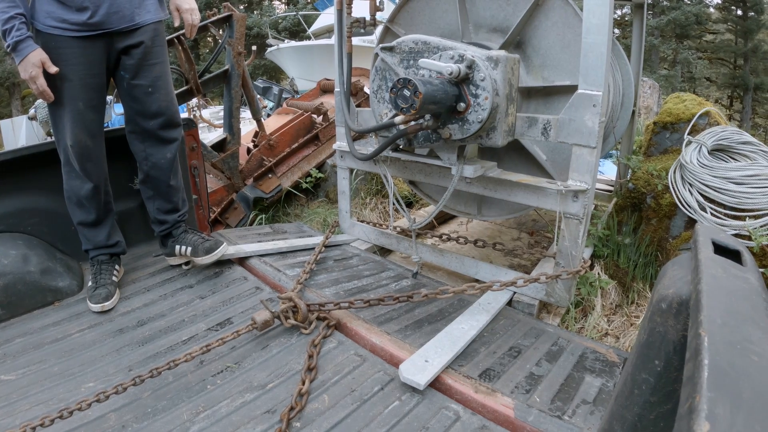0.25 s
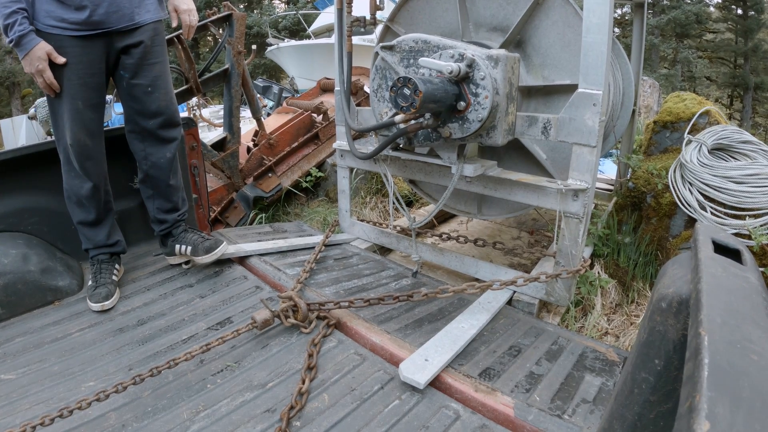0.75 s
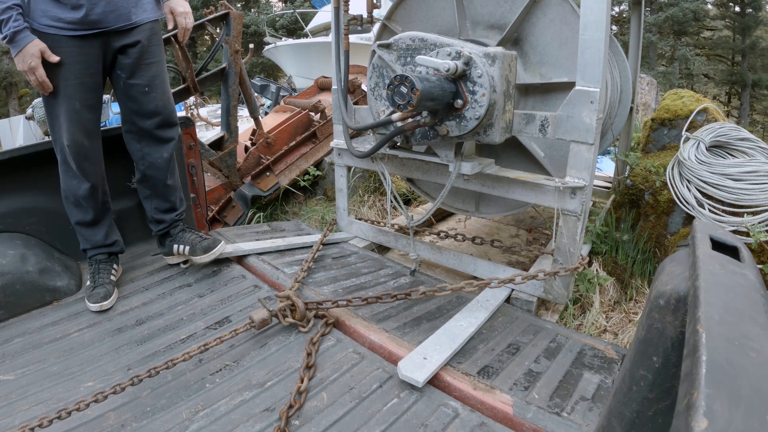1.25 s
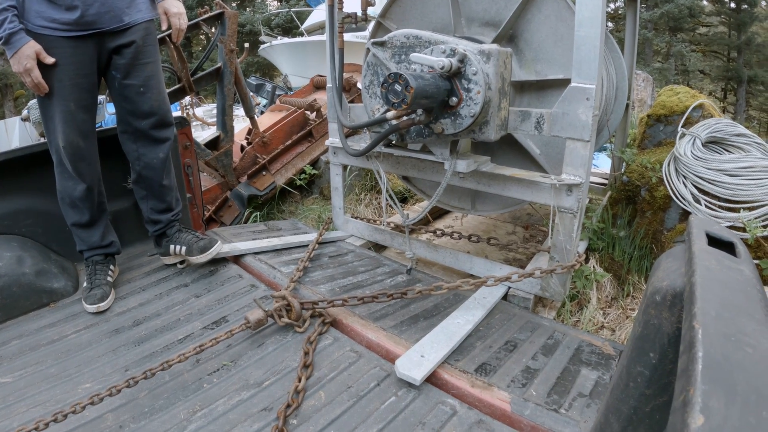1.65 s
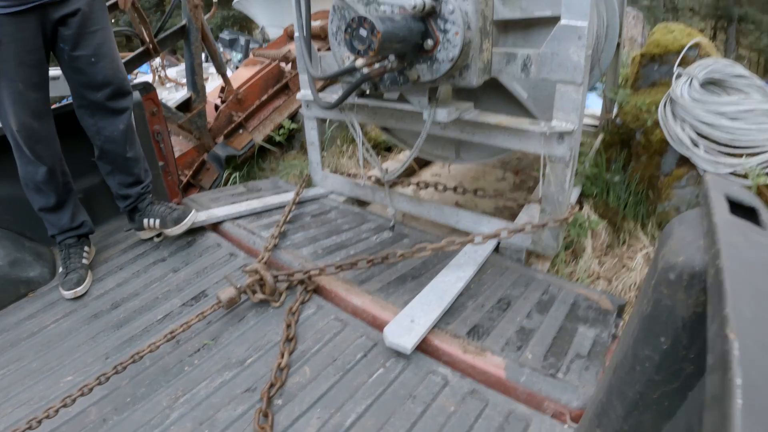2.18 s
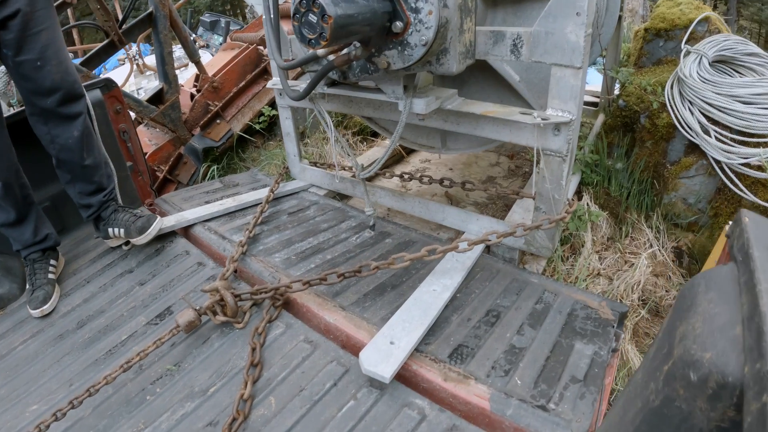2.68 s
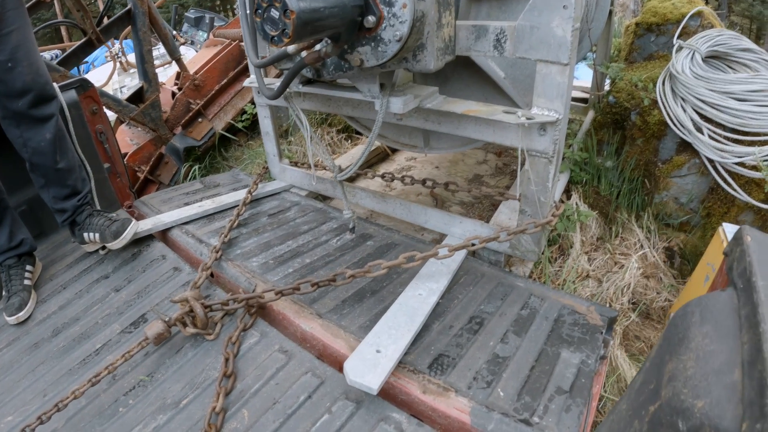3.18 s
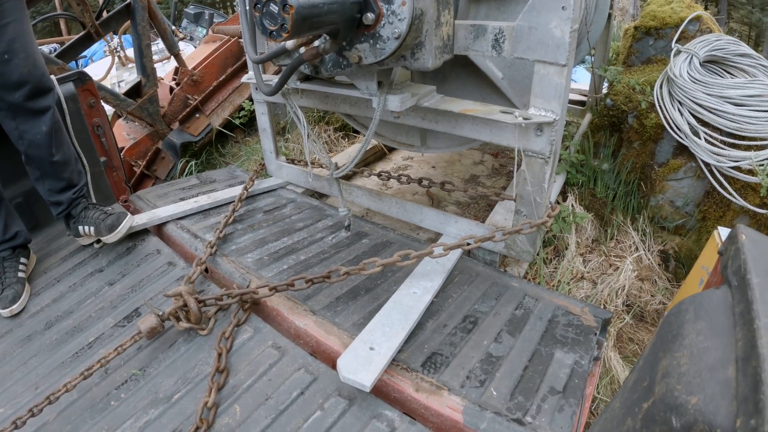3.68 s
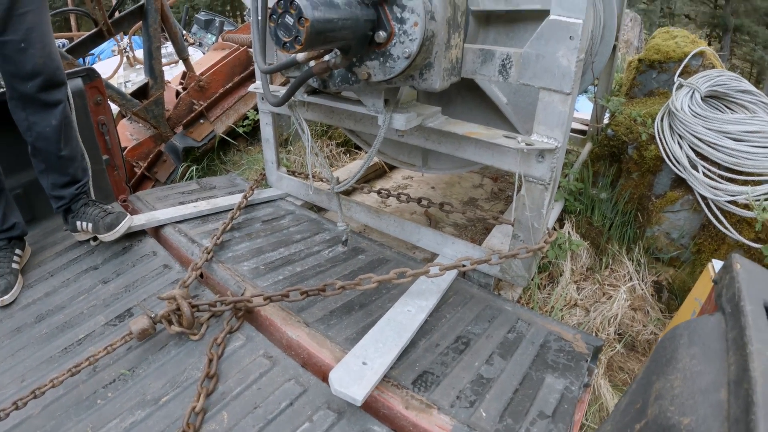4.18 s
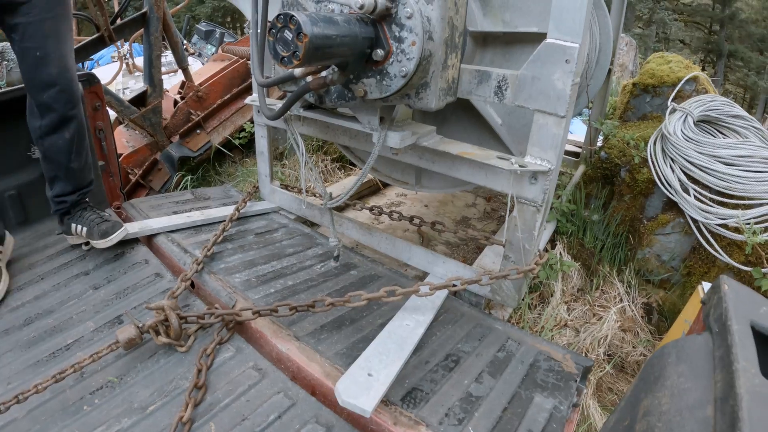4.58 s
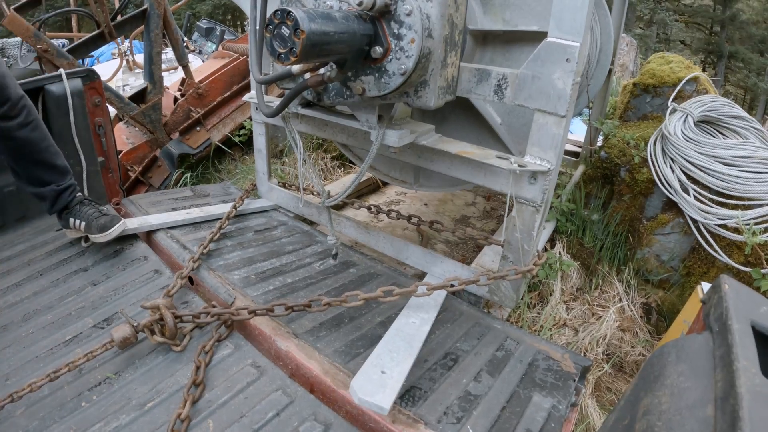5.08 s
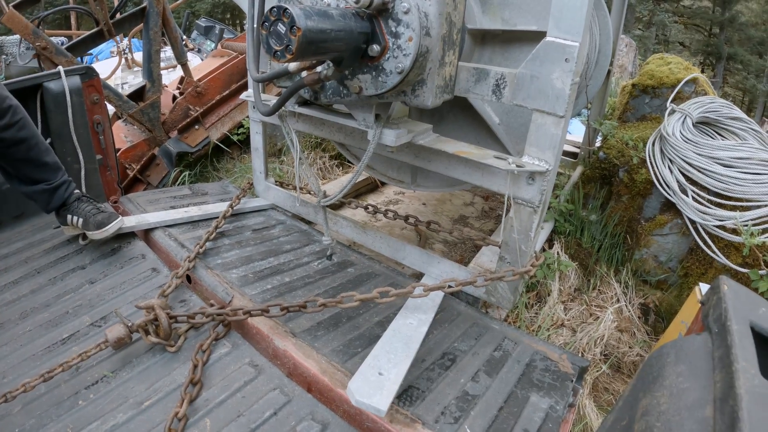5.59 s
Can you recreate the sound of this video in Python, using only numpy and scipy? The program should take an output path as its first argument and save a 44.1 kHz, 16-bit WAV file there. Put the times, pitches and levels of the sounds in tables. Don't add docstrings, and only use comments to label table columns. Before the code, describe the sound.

A hand ratchet winch clicks in rapid metallic bursts as a heavy steel reel scrapes over a booming truck bed, then a boot scuffs and stamps.

```python
import sys
import numpy as np
from scipy import signal
from scipy.io import wavfile
from scipy.ndimage import uniform_filter1d

SR = 44100
rng = np.random.default_rng(int(sys.argv[2]) if len(sys.argv) > 2 else 0)


def invert_db(x):
    u = np.asarray(x, float) / 20
    return 10 ** u


def transcribe(u):
    v = np.clip(np.atleast_2d(u).T, -1, 1)
    q = np.round(v * 32767).astype(np.int16)
    wavfile.write(sys.argv[1], SR, q)


N = 257984
LEAD = 900
BOOT_S = 5.098

# (frequency [Hz], level [dB per Hz])
CHATTER = [(350, -41), (600, -23), (1060, -2.5), (1840, -9), (2670, -8.5), (3020, -11), (4900, -8),
           (5860, -13.5), (6370, -3.5), (8000, -21), (11300, -35)]
# (start [s], end [s])
PULLS = [
    (0, .45),
    (1.2, 1.5),
    (2.66, 3.0),
    (3.7, 4.1),
    (5.0, 5.85),
]
# (time [s], peak [dB], frame clank [dB rel], chatter length [ms])
HAULED = [(0.083, -8.5, -5, 11.8), (.174, -7, -8.5, 8.8), (0.2518, -9, -9.5, 10.8), (0.3025, -13.5, -6, 23),
          (0.318, -19.5, -2.5, 16), (1.267, -9, -3.5, 11), (1.3342, -11, -9.5, 17), (1.395, -11, -11.5, 12),
          (1.4606, -10.5, -10.5, 13.3), (2.6884, -10.5, -12, 14), (2.7552, -10, -10, 15),
          (2.812, -14, -3.5, 13.3), (2.8692, -13, -6, 9.6), (2.9638, -11, -5.5, 10), (3.758, -12, -8, 18),
          (3.8388, -9, -10, 13), (3.911, -12, -10, 20.6), (3.9721, -12.5, -33, 17), (4.0476, -9, -9.5, 13)]


def rms_one(x):
    return x / np.sqrt(np.mean(x ** 2) + 1e-20)


def in_time(rows, outside=None):
    s, *columns = np.transpose(rows)
    return [np.interp(np.arange(N) / SR, s, c, outside, outside) for c in columns]


def at_hz(points, hz):
    table_hz, values = np.array(points)[:, 0], np.array(points)[:, 1]
    return np.interp(np.log(hz), np.log(table_hz), values)


def filled(coarse):
    return np.interp(np.arange(N) / 32, np.arange(len(coarse)), coarse)


def add(out, s, piece):
    at = round(s * SR)
    out[..., at:at + piece.shape[-1]] += piece[..., :N - at]


def drift(rate):
    r = np.exp(-80 * np.pi * rate / SR)
    slow = signal.lfilter([1], [1, -2 * r, r * r], rng.standard_normal(N // 40 + 2002))[2000:]
    return np.interp(np.arange(N) / 40, np.arange(len(slow)), rms_one(slow))


def ring(force, hz, t60):
    r, w = invert_db(-60 / (t60 * SR)), 2 * np.pi * hz / SR
    gain = 2 * np.sqrt(1 - r) * np.sin(w)
    return signal.lfilter([0, gain], [1, -2 * r * np.cos(w), r * r], force + 1e-18)


def grains(per_s, spread_db, size=N):
    heights = invert_db(spread_db * np.minimum(rng.exponential(1, (2, size)), 4))
    signs = rng.choice([-1, 1], (2, size))
    return rms_one(heights * signs * (rng.random((2, size)) < per_s / SR))


def bands(low_hz, sources, order=2):
    edges = low_hz * 2 ** np.arange(0, np.log2(18000 / low_hz), .5)
    for k, (low, high) in enumerate(zip(edges, edges[1:])):
        sos = signal.butter(order, [low, high], "band", fs=SR, output="sos")
        yield np.sqrt(low * high), signal.sosfilt(sos, sources[k % 2])


def placed(pair, hz, likeness, balance_db):
    alike = np.clip(at_hz(likeness, hz), 0, 1)
    both = np.sqrt(1 + alike) * pair[0] + np.sqrt(1 - alike) * pair[1] * [[1], [-1]]
    return both * invert_db(balance_db / 2 * np.array([[1], [-1]])) / np.sqrt(2)


def near(pair, hz):
    # (frequency [Hz], left-right likeness [0-1])
    near_likeness = [(60, 1.0), (180, 1), (550, 0.9), (1650, 0.63), (4970, 0.6), (15000, 0.019)]
    # (frequency [Hz], left over right [dB])
    near_balance = [(60, 0.5), (150, 0.5), (380, 0.5), (950, 8), (2380, 5), (5980, 1), (15000, 8)]
    return placed(pair, hz, near_likeness, at_hz(near_balance, hz))


def chatter(length_ms, rise_ms, slide_db=-30, rattle_db=-14, size=4000):
    ms = (np.arange(size) - LEAD) * 1000 / SR
    after = np.maximum(ms, 0)
    hold = np.exp(-(after / max(length_ms, 1)) ** 2)
    rattle = invert_db(rattle_db) * np.exp(-after / (1.62 * length_ms))
    slide = invert_db(slide_db) * np.exp(-np.abs(ms) / 19.0)
    return (1 - np.exp(-after / rise_ms)) * (hold + rattle) + slide


def drops():
    # (time [s], peak [dB], frame clank [dB rel], chatter length [ms])
    returned = [(0.6497, -10.5, -10.5, 17), (0.7458, -11, -10, 23.5), (0.8546, -13.5, -8, 17.2),
                (1.0232, -14.5, -11, 12), (1.704, -15, -4, 15.8), (1.7995, -9.5, -13, 14.5),
                (1.8941, -15, -6.5, 22.3), (2.1369, -11.5, -12, 18.2), (2.2154, -13, -7.5, 19),
                (2.297, -11.5, -10, 18), (3.183, -11.5, -12.5, 20), (3.257, -10, -13.5, 17),
                (3.3307, -14, -9, 16), (3.4398, -14, -7, 12.2), (4.2987, -13, -7.5, 13.8),
                (4.383, -14, -8.5, 22), (4.482, -14.5, -4, 15.4)]
    # (time [s], peak [dB], sharpness [dB rel], chatter length [ms])
    clunks = [(0.541, -11.5, -35, 13.8), (1.132, -45, -28, 16), (1.975, -32, -52, 6.5),
              (2.0566, -12.5, -52, 21.2), (2.5126, -24.5, -42, 12), (2.54, -27.5, -49.5, 7.4),
              (2.552, -21, -54, 16), (3.0612, -13, -60, 13.5), (3.1233, -18, -58.5, 9.5),
              (3.3916, -16, -62.5, 11), (3.5044, -39, -53, 18), (3.564, -16, -71, 8.5),
              (3.8138, -24, -36, 14), (4.178, -18.5, -62, 16), (4.2034, -29, -45.5, 7.9),
              (4.2353, -23.5, -39, 12), (4.4621, -27, -54, 32)]
    # (time [s], peak [dB], frame clank [dB rel], chatter length [ms])
    slips = [(.046, -27.5, -5.5, 6.2), (0.15, -28, 3.5, 2.7), (0.227, -30, -30, 53), (1.007, -39.5, 0, 10),
             (1.2362, -30, -4, 7.6), (1.6506, -24.5, -1.5, 15), (2.2052, -33, 3, 8.2),
             (3.7256, -29.5, -1.5, 7.2), (4.0211, -23, -6, 14), (5.255, -36, 2, 16),
             (5.31, -37.5, 15.5, 5.7), (5.344, -20, -36, 16), (5.409, -24, -34, 8), (5.4165, -18, -37, 12)]
    stroke_sharp_db = [-1, -6, 2.5, -0.8]
    strikes = []
    for s, db, clank, ms in HAULED:
        stroke = sum(s > end for _, end in PULLS)
        strikes.append((s, db, clank, -13.5 + stroke_sharp_db[stroke], 3, ms))
    for s, db, clank, ms in returned:
        strikes.append((s, db, clank, -23.5 + 1.44 * s, -1 + 1.2 * s, ms))
    for s, db, sharp, ms in clunks:
        strikes.append((s, db, -10.5 - 0.46 * (db + 6), sharp, -5.5, ms))
    for s, db, clank, ms in slips:
        strikes.append((s, db, clank, -20, -6, ms))
    return sorted(strikes)


def click_db(hz):
    s, peak_db, clank_db, sharp_db, *_ = np.transpose(drops())
    low = np.interp(np.log(hz), np.log([1300, 2500]), [1, 0])
    high = np.interp(np.log(hz), np.log([6500, 10000, 15000]), [0, 1.0, 1.5])
    return peak_db + low * (clank_db + 10.5) + high * (sharp_db + 26)


def bursts(levels_db, rise_ms):
    out = np.zeros(N)
    for (s, _, _, sharp_db, _, length_ms), db in zip(drops(), levels_db):
        soft = 1 + max(0, -sharp_db - 28) / 9
        start_s = s - LEAD / SR - .0008 * (soft - 1)
        add(out, start_s, invert_db(db) * chatter(length_ms, rise_ms * soft))
    return out


def swell(s, db, rise_s, hold_s, fall_db_per_s):
    after = np.arange(0, N, 32) / SR - s
    fall_db = fall_db_per_s * np.maximum(after - rise_s - hold_s, 0)
    return (invert_db(db - np.minimum(fall_db, 200)) * np.clip(after / rise_s, 0, 1) ** 2) ** 2


def scrape(level, grit_db, spectrum, low_hz, per_s, clumpy_db):
    rub, size = 0, len(level)
    for hz, pair in bands(low_hz, [grains(per_s, 4.6, size), grains(per_s, 0.32, size)]):
        gritty = np.interp(np.log(hz), np.log([2000, 4500]), [0, 1])
        rub = rub + near(pair, hz) * invert_db(at_hz(spectrum, hz) + grit_db * gritty)
    return level * invert_db(clumpy_db * drift(100)[:size]) * rms_one(rub)


def road(offset_db=3, patchy_db=.8):
    # (frequency [Hz], level [dB per Hz])
    wash = [(18, -33), (30, 1), (76, 12), (119, -16), (158, -6.5), (384, -14.5), (774, -11.5), (905, -0.5),
            (1090, -8), (1600, -17.5), (1730, -27), (3230, -32), (8000, -41), (11500, -48), (14000, -78)]
    # (time [s], level [dB])
    road_level = [(0.0, -38.5), (0.57, -42.5), (2.64, -42.5), (3.27, -36), (3.57, -40.5), (3.8, -43.5),
                  (3.91, -39), (4.69, -43.5), (5.51, -39), (5.85, -41.5)]
    # (frequency [Hz], left-right likeness [0-1])
    far_likeness = [(60, 1.0), (380, 0.97), (2380, 0.41), (15000, 0.37)]
    out = 0
    for hz, pair in bands(27.05, rng.standard_normal((2, 2, N))):
        out = out + invert_db(at_hz(wash, hz) + patchy_db * drift(3.2)) * placed(pair, hz, far_likeness, .7)
    return invert_db(in_time(road_level)[0] + offset_db) * rms_one(out)


def small_things(tick_db=2, buckle_db=-24):
    # (time [s], peak [dB])
    ticks = [(1.991, -44), (2.0144, -44), (2.4364, -42), (2.673, -35), (4.993, -39.5), (5.013, -51),
             (5.0234, -40), (5.121, -34), (5.1324, -45), (5.237, -44), (5.2827, -30), (5.302, -32),
             (5.5343, -28), (5.5424, -52), (5.6834, -57), (5.7831, -42)]
    # (time [s], peak [dB])
    jingles = [
        (5.5877, -33.5),
        (5.6945, -32),
    ]
    # (frequency [Hz], level [dB], t60 [s])
    buckle = [(3800, -6, .02), (4400, -1, .018), (5800, 0, .018), (8000, 0, .02), (10100, -8, .018)]
    out, ms = np.zeros(N), np.arange(3000) * 1000 / SR
    crack_band = signal.butter(3, [1800, 8000], "band", fs=SR, output="sos")
    for s, db in ticks:
        crack = rng.standard_normal(len(ms)) * np.exp(-ms / .5)
        add(out, s, invert_db(db + tick_db) * signal.sosfilt(crack_band, crack))
    for s, db in jingles:
        shake = rng.standard_normal(len(ms)) * np.exp(-ms / 8.0)
        jingle = sum(invert_db(mode_db) * ring(shake, hz, t60) for hz, mode_db, t60 in buckle)
        add(out, s, invert_db(db + buckle_db) * jingle * 4)
    return out * invert_db(np.array([[1.5], [-1.5]]))


def boot(hollow_db=-12):
    # (time [s], level [dB], rise [s], hold [s], fall [dB/s])
    footfalls = [
        (5.13, -31, 0.14, .05, 300),
        (5.26, -20, 0.047, .11, 348),
        (5.44, -36, .01, 0.046, 206),
        (5.555, -12, 0.0022, 0.029, 427),
        (5.636, -34, 0.024, 0.024, 137),
    ]
    # (start [s], end [s])
    flat_s = (4.9, 6.4)
    # (frequency [Hz], level [dB per Hz])
    sole = [(53, -41), (90, -13), (212, 2.5), (733, -8.5), (948, -11), (1310, -14), (1550, -17),
            (2330, -26), (5030, -30), (11100, -51), (15000, -62)]
    # (frequency [Hz], level [dB], t60 [s])
    hollow = [(186.5, 2.5, 0.68), (209.7, 6, 0.28), (269, 3.5, 0.4), (438, 3.5, 0.077)]
    out, start = np.zeros((2, N)), round(BOOT_S * SR)
    level = filled(np.sqrt(sum(swell(*row) for row in footfalls)))[start:]
    s = np.arange(start, N) / SR
    grit_db = np.where((s > flat_s[0]) & (s < flat_s[1]), -11.5, 11.5)
    force = level * invert_db(hollow_db) * rng.standard_normal((2, N - start))
    drum = sum(invert_db(db) * near(ring(force, hz, t60), hz) for hz, db, t60 in hollow)
    add(out, BOOT_S, drum + scrape(level, grit_db, sole, 99.6, per_s=7600, clumpy_db=1.0))
    return out


def skids():
    # (time [s], scrape [dB])
    drag = [
        [(1.26, -64), (1.28, -22), (1.34, -45), (1.45, -43)],
        [(2.5, -63), (2.54, -34.5), (2.62, -49.5), (2.68, -44)],
        [(2.7, -46), (2.85, -32.5), (2.93, -38), (3.0, -88), (3.3, -37.5), (3.55, -50)],
        [(3.9, -45), (3.93, -26), (3.99, -20), (4.05, -30), (4.09, -37)],
    ]
    # (frequency [Hz], level [dB per Hz])
    skid = [(350, -29), (600, -1), (734, -5.5), (911, -4), (1910, -7.5), (7750, -25), (15000, -51.5)]
    out = np.zeros((2, N))
    pull = sum(invert_db(in_time(rows, outside=-150)[0]) for rows in drag)[:round(4.2 * SR)]
    add(out, 0, scrape(pull, 0, skid, 537, per_s=4100, clumpy_db=-0.5))
    return out


def shaking():
    # (time [s], boom [dB], drumming [dB], rib knock [dB], hold [s])
    lurches = [(0.3, -15.5, -19.5, -30, 0.087), (0.534, -22, -21, -34.5, 0.087),
               (0.756, -27, -22.5, -41, 0.092), (1.014, -17.5, -24, -37.5, 0.096),
               (1.274, -18, -18, -24.5, .09), (1.695, -21.5, -21, -33.5, 0.092),
               (1.903, -24.5, -20.5, -50, 0.098), (2.051, -27, -19, -31.5, .05),
               (2.541, -15, -21.5, -39, 0.079), (3.261, -27.5, -23.5, -38.5, 0.059),
               (3.558, -16.5, -27.5, -58, 0.066), (3.912, -25, -17, -33.5, 0.17),
               (4.174, -22, -23.5, -35.5, 0.037), (4.404, -28, -22.5, -49, 0.035),
               (5.047, -37.5, -55, -52, 0.1)]
    # (level under a drop [dB], rise [s], fall [dB/s], share of a lurch's hold [0-1], rest level [dB])
    panels = [
        (-14.5, 0.026, 107.5, 1, -65.5),
        (-11, 0.0052, 111, 0.41, -53.5),
        (-26, 0.0058, 226, 0.35, -55.5),
    ]
    hauled_shake_db = [-1.5, -4, 1]
    hauled = [row[0] for row in HAULED]
    for family, (under_db, rise_s, fall, share, rest_db) in enumerate(panels):
        power = invert_db(rest_db) ** 2
        for s, db in zip(np.array(drops())[:, 0], click_db([3000, 3000, 1000][family])):
            if s < BOOT_S:
                taut_db = hauled_shake_db[family] * (s in hauled)
                power = power + swell(s, db + under_db + taut_db, rise_s, rise_s, fall)
        for s, *levels_db, hold_s in lurches:
            power = power + swell(s, levels_db[family], 0.36 * rise_s, share * hold_s, 1.23 * fall)
        yield filled(10 * np.log10(power))


def bed(jolt_db=14, lumpy_db=0.5):
    # (frequency [Hz], level [dB], t60 [s])
    bed_modes = [(51, -7, 0.23), (72, 4, 0.2), (91.6, 2, 0.19), (126.4, -16, 0.15), (150.9, 7.5, 0.084),
                 (174.6, -0.5, 0.047), (210, 0, 0.071), (235, -10, 0.13), (284.3, -12.5, 0.22),
                 (350, -14, .1), (423.4, -1.5, 0.21), (484.6, 3.5, 0.038), (572.7, 1.5, 0.054),
                 (611, -13, 0.18)]
    out, jolt = 0, bursts(np.array(drops())[:, 1] + jolt_db, rise_ms=26.0)
    force = rng.standard_normal((2, N)) * (0.89 + jolt) * invert_db(lumpy_db * drift(25))
    for (low, high), level_db in zip([(38, 110), (110, 400), (400, 750)], shaking()):
        group = sum(invert_db(db) * ring(force, hz, t60) for hz, db, t60 in bed_modes if low < hz <= high)
        sos = signal.butter(2, [1.17 * low, 1.11 * high], "band", fs=SR, output="sos")
        group = signal.sosfilt(sos, group)
        even = np.sqrt(uniform_filter1d(group[0] ** 2, size=5000) + 1e-12)
        out = out + invert_db(level_db) * near(group / even, np.sqrt(low * high))
    return out


def handle(spread_db=3.0, held_db=-18):
    # (frequency [Hz], level [dB], t60 [s])
    handle_modes = [(4926, -46, .4), (6333, -40, .22), (8370, -43, .1), (9200, -54, .07), (10770, -52, .05),
                    (11630, -58, .05)]
    times = np.array(drops())[:, 0]
    held = np.isin(times, np.array(HAULED)[:, 0]) | (times > BOOT_S)
    noise, luck = rng.standard_normal((2, N)), rng.standard_normal((len(times), len(handle_modes)))
    out = 0
    for (hz, db, t60), chance in zip(handle_modes, luck.T):
        levels_db = click_db(max(hz, 8000)) + db + held_db * held + spread_db * chance
        out = out + near(ring(noise * bursts(levels_db, rise_ms=1.5), hz, t60), hz)
    return out


def struck(clank_db=-2, chink_db=0.5, ping_db=1.5, stray_db=-5, build_ms=6.0):
    # (time of peak [s], frequency [Hz], peak [dB])
    clanks = [(0.091, 1370.0, -23), (0.185, 1200.0, -21), (0.264, 1200.0, -23), (0.31, 1080.0, -18),
              (0.672, 1420.0, -28), (0.752, 1200.0, -27), (0.867, 1230.0, -25), (1.278, 1090.0, -18),
              (1.355, 1150.0, -24), (1.416, 1270.0, -27), (1.725, 1160.0, -23), (1.807, 1220.0, -26),
              (1.908, 1080.0, -22), (2.31, 1250.0, -27), (2.561, 1080.0, -26), (2.708, 980.0, -26),
              (2.767, 1310.0, -23), (2.821, 1160.0, -19), (2.875, 1160.0, -21), (2.97, 1160.0, -23),
              (3.191, 1300.0, -25), (3.265, 1310.0, -21), (3.341, 1320.0, -26), (3.443, 1440.0, -22),
              (3.766, 1020.0, -24), (3.767, 1350.0, -18), (3.847, 1380.0, -24), (3.848, 930.0, -20),
              (3.94, 1220.0, -25), (4.242, 1440.0, -30), (4.312, 1080.0, -23), (4.393, 1370.0, -23),
              (4.399, 1090.0, -22), (4.49, 1450.0, -19)]
    # (time of peak [s], frequency [Hz], peak [dB])
    chinks = [(0.311, 3570.0, -26), (0.548, 3270.0, -27), (0.659, 2620.0, -26), (0.754, 3490.0, -28),
              (0.861, 3970.0, -30), (0.862, 2260.0, -24), (1.907, 2270.0, -27), (2.065, 4130.0, -28),
              (2.14, 2540.0, -26), (2.314, 2610.0, -24), (2.758, 4310.0, -25), (2.816, 4340.0, -25),
              (3.067, 3610.0, -23), (3.191, 3470.0, -27), (3.265, 2540.0, -23), (3.27, 2190.0, -27),
              (3.286, 3260.0, -27), (3.343, 3410.0, -26), (3.44, 3500.0, -35), (3.849, 2290.0, -27),
              (3.92, 2280.0, -23), (3.976, 2610.0, -26), (4.191, 2140.0, -33), (4.388, 3400.0, -26),
              (4.399, 2570.0, -26), (4.494, 3520.0, -30), (4.495, 2200.0, -28)]
    # (time of peak [s], frequency [Hz], peak [dB])
    pings = [(0.546, 5100.0, -28), (0.55, 6370.0, -34), (0.665, 4870.0, -27), (0.748, 4950.0, -24),
             (0.751, 4640.0, -24), (0.859, 6330.0, -25), (0.862, 5090.0, -29), (0.872, 7710.0, -37),
             (1.273, 5110.0, -26), (1.467, 4870.0, -25), (1.713, 5010.0, -29), (1.904, 6380.0, -27),
             (2.064, 4940.0, -27), (2.14, 5050.0, -25), (2.146, 4730.0, -22), (2.299, 5050.0, -22),
             (2.307, 7690.0, -31), (2.315, 8390.0, -36), (2.696, 6170.0, -28), (2.696, 7280.0, -21),
             (2.697, 4820.0, -28), (3.185, 4730.0, -22), (3.195, 6310.0, -26), (3.264, 6350.0, -26),
             (3.333, 4970.0, -17), (3.446, 6340.0, -18), (3.447, 4930.0, -24), (3.765, 6230.0, -27),
             (4.302, 4740.0, -26), (4.304, 6370.0, -22), (4.39, 4940.0, -24), (4.393, 5860.0, -29),
             (4.491, 4710.0, -25), (4.499, 6370.0, -31), (4.499, 7540.0, -34)]
    # (time of peak [s], frequency [Hz], peak [dB])
    strays = [(1.013, 2360, -33), (1.027, 4970, -17), (1.032, 5280, -19), (1.038, 4830, -30),
              (1.132, 2130, -47), (1.143, 2150, -39), (1.288, 1000, -18), (1.297, 1200, -15),
              (1.979, 2230, -36), (2.262, 7690, -41), (2.435, 4400, -49), (2.63, 4250, -53.5),
              (4.33, 7700, -38), (5.287, 695, -28.5), (5.304, 1020, -21), (5.309, 905, -13),
              (5.324, 1025, -18), (5.367, 1090, -32), (5.391, 1210, -28), (5.559, 890, -24),
              (5.566, 1320, -12), (5.574, 980, -14)]
    # (frequency [Hz], t60 [s])
    struck_t60 = [(900, .035), (1400, .05), (2500, .045), (4000, .04), (5000, .045), (6350, .09),
                  (7000, .04), (7700, .1)]
    out, ms = np.zeros((2, N)), np.arange(4000) * 1000 / SR
    build = (ms / build_ms) * np.exp(-(ms / build_ms) ** 2)
    for rows, level_db in [(clanks, clank_db), (chinks, chink_db), (pings, ping_db), (strays, stray_db)]:
        for s, hz, db in rows:
            rung = ring(rng.standard_normal((2, len(ms))) * build, hz, at_hz(struck_t60, hz))
            rung = rung / np.abs(rung).max(axis=1, keepdims=True)
            add(out, s - build_ms / 1000, invert_db(db + level_db) * near(rung, hz))
    return out


def chain(level_db=6.5, bright_db=25, count=7):
    out, luck = np.zeros((2, N)), rng.random((len(drops()), count, 3))
    decay = np.exp(-np.arange(1600) / 130)
    for (s, peak_db, _, sharp_db, _, length_ms), links in zip(drops(), luck):
        for pitch, late, size in links:
            hz = 1500 * 9 ** pitch
            db = peak_db + level_db + at_hz(CHATTER, hz) - 22 * late - 8 * size
            db = db + (sharp_db + bright_db) * (hz > 7500)
            knock = rng.standard_normal((2, 1600)) * decay
            add(out, s + 2e-3 * length_ms * late, invert_db(db) * near(ring(knock, hz, .035), hz))
    return out


def frame(level_db=-22, shift_hz=18, damped_db=-13):
    # (frequency [Hz], t60 [s])
    frame_modes = [(900, .06), (1085, .07), (1180, .05), (1345, .06), (1500, .05), (2160, .06), (2290, .05),
                   (2575, .06), (3300, .05), (3530, .05), (4010, .05), (4700, .04), (4926, .05),
                   (5350, .05), (6330, .12), (6400, .05), (7680, .11), (8400, .07)]
    frame_db = [-6, -1, -12.5, -5, -20, -6, -9.5, -3.5, -9.5, -3.5, -9, -5, 4.5, -22, -6.5, -2.5, -16.5,
                -35]
    out, luck = np.zeros((2, N)), rng.standard_normal((len(drops()), len(frame_modes), 2))
    taut = np.array([any(a < row[0] < b for a, b in PULLS) for row in drops()])
    levels_db = np.transpose([click_db(hz) + db + damped_db * taut * (hz > 2000)
                              for (hz, _), db in zip(frame_modes, frame_db)])
    levels_db = levels_db + level_db + 3.5 * luck[..., 0]
    for row, mode_db, shift in zip(drops(), levels_db, shift_hz * luck[..., 1]):
        lumps = np.repeat(rng.uniform(.3, 1.7, 60), 100)
        force = rng.standard_normal((2, 4400)) * lumps[:4400] * chatter(row[-1], rise_ms=0.75, size=4400)
        rung = 0
        for (hz, t60), db, off in zip(frame_modes, mode_db, shift):
            rung = rung + invert_db(db) * near(ring(force, hz + off, t60), hz)
        add(out, row[0] - LEAD / SR, invert_db(row[4]) * rung)
    return out


def pawl(level_db=3, tail_db=-5, linger_db=-25, linger_t60=0.41):
    # (frequency [Hz], t60 [s])
    ring_down = [(400, 0.83), (1100, 0.19), (2900, 0.1), (7700, 0.012), (14000, 0.017)]
    out, knocks = 0, [grains(5400, 4.3), grains(4300, 6.14)]
    for hz, pair in bands(595, knocks, order=3):
        levels_db = click_db(hz) + rng.normal(0, 0.41, len(drops()))
        energy = bursts(levels_db, rise_ms=0.41) ** 2
        total = energy
        for db, t60 in [(tail_db, at_hz(ring_down, hz)), (linger_db - (hz / 2600) ** 2, linger_t60)]:
            r = invert_db(-120 / (t60 * SR))
            total = total + invert_db(db) ** 2 * signal.lfilter([1 - r], [1, -r], energy)
        out = out + np.sqrt(total) * invert_db(at_hz(CHATTER, hz) + level_db) * near(pair, hz)
    return out


def scene():
    around = road() + small_things() + boot()
    reel = skids() + bed()
    winch = handle() + struck() + chain() + frame() + pawl()
    return around + reel + winch


def low_pass(x):
    return signal.sosfilt(signal.butter(12, 16450, fs=SR, output="sos"), x)


def record(dry):
    x = signal.sosfilt(signal.butter(3, 38, "high", fs=SR, output="sos"), dry)
    x = 0.63 * np.tanh(x / 0.79)
    x = signal.sosfilt(signal.butter(8, 14500, fs=SR, output="sos"), x)
    x = signal.sosfilt(signal.cheby2(8, 50, 16700, fs=SR, output="sos"), x)
    return low_pass(x)


dry = scene()
out = record(dry)
transcribe(out)
```